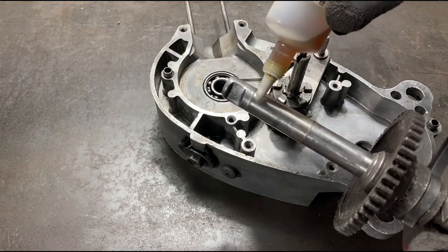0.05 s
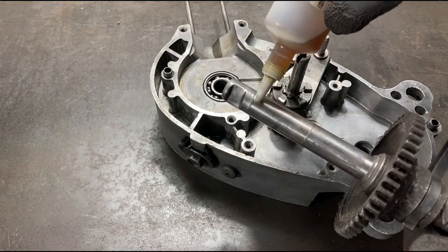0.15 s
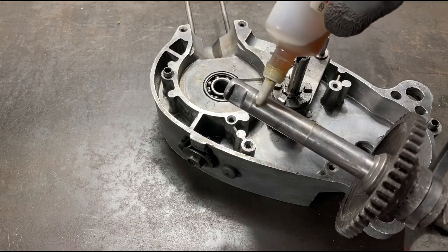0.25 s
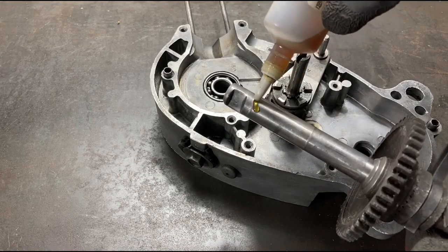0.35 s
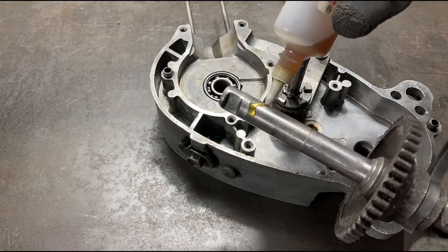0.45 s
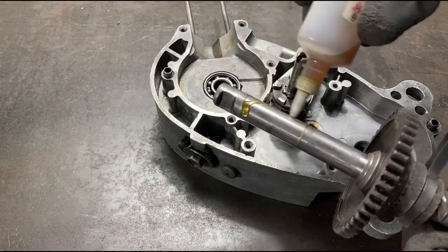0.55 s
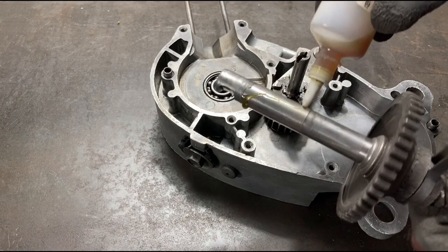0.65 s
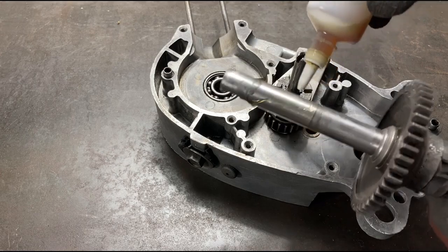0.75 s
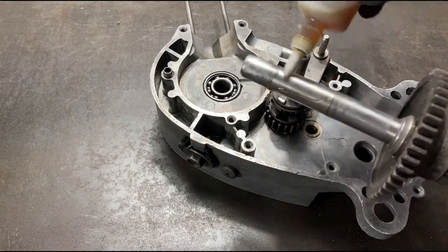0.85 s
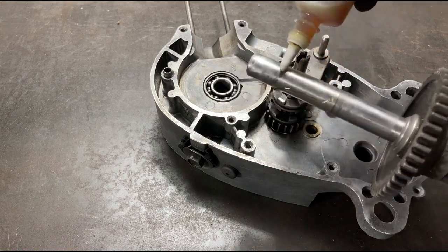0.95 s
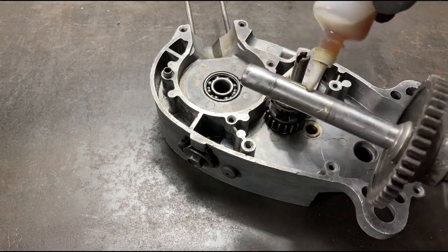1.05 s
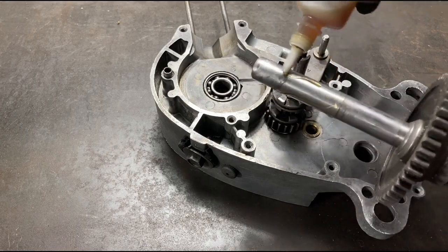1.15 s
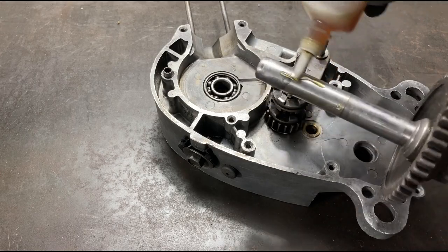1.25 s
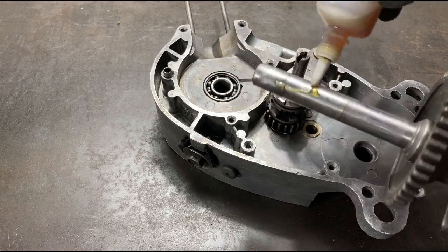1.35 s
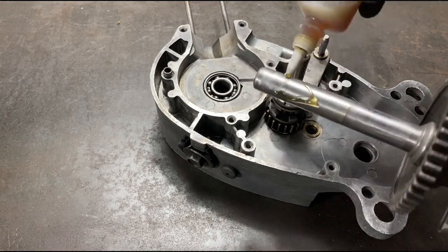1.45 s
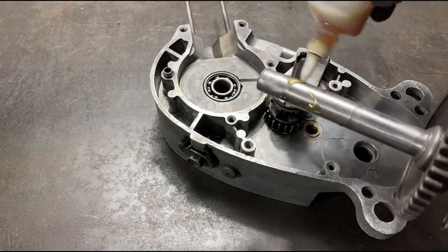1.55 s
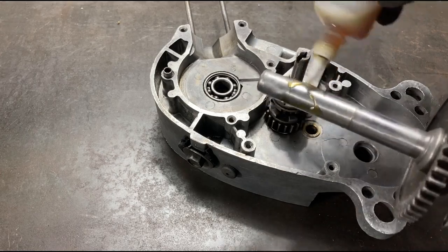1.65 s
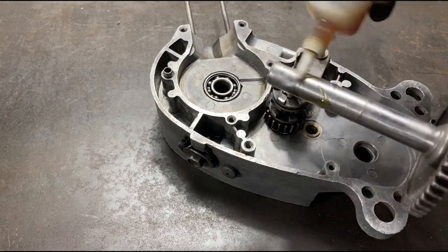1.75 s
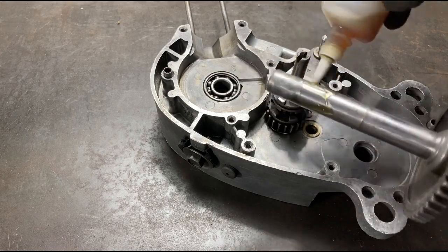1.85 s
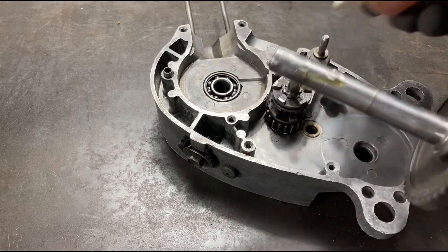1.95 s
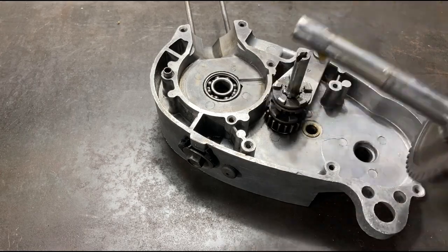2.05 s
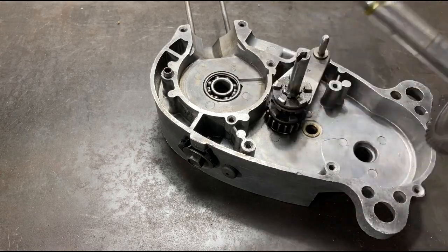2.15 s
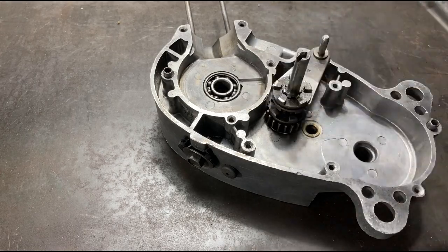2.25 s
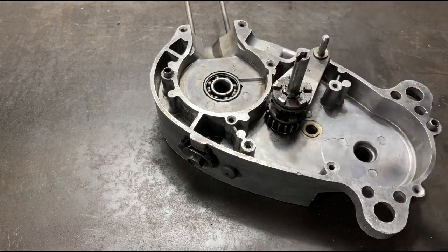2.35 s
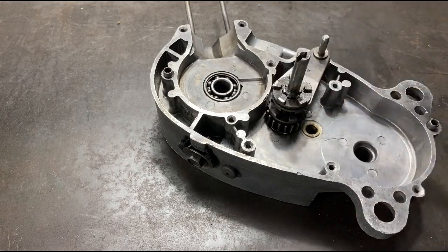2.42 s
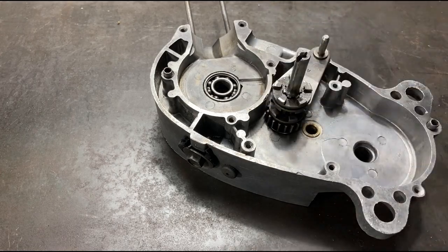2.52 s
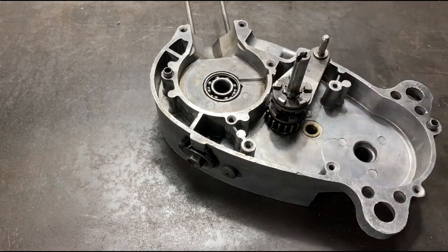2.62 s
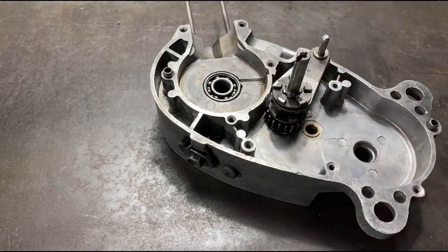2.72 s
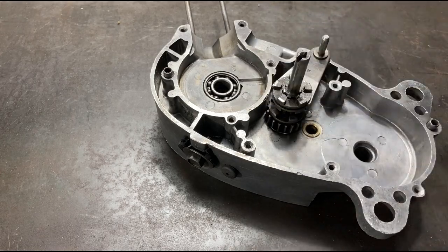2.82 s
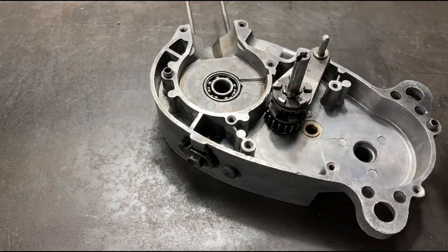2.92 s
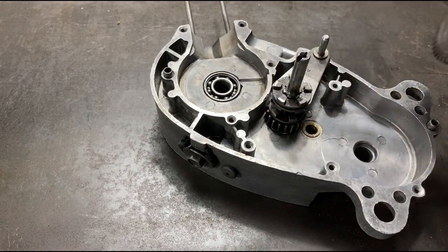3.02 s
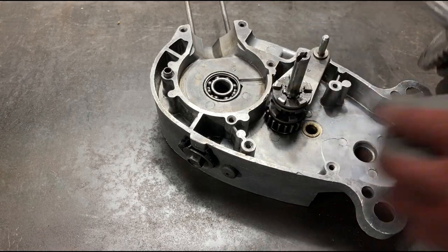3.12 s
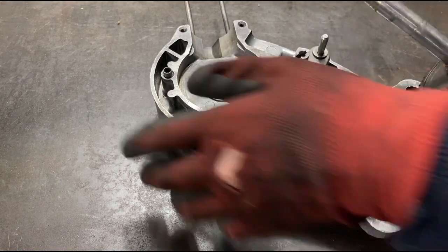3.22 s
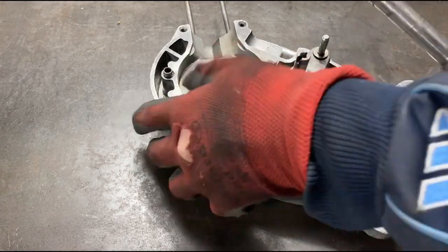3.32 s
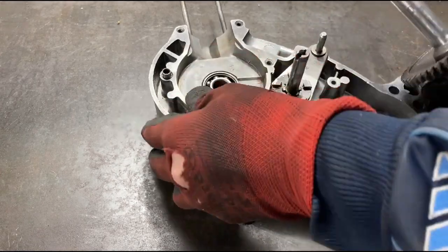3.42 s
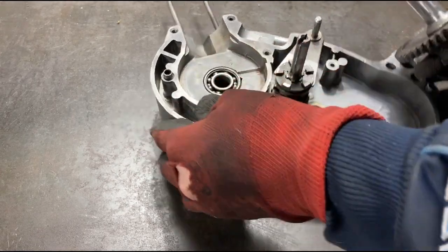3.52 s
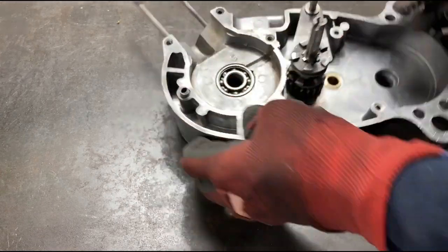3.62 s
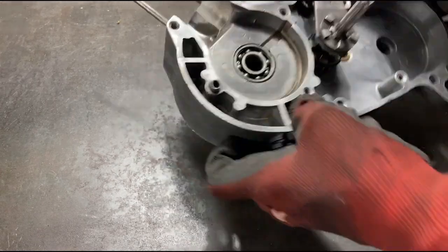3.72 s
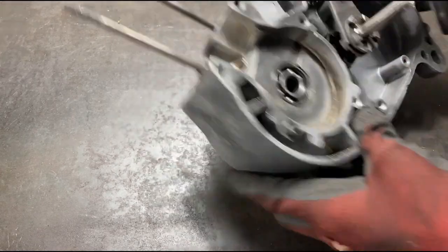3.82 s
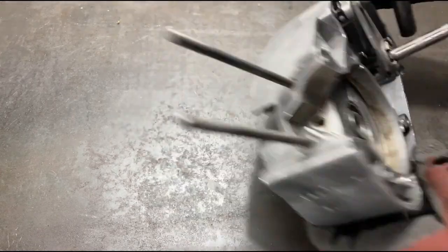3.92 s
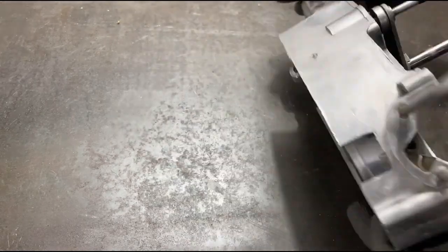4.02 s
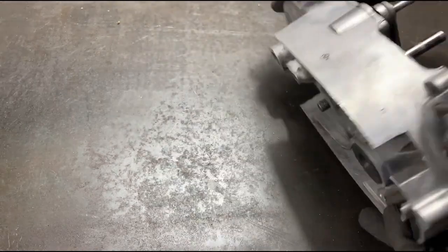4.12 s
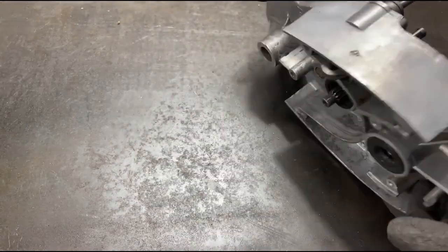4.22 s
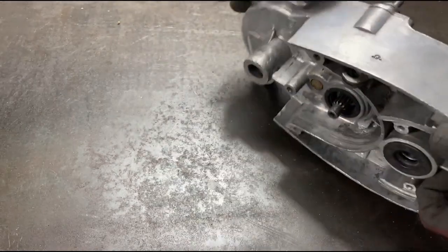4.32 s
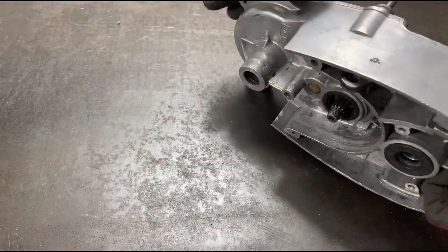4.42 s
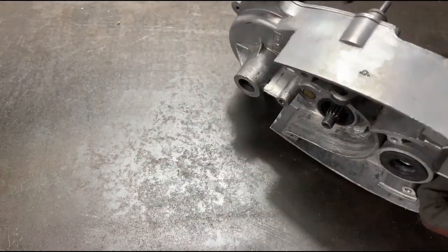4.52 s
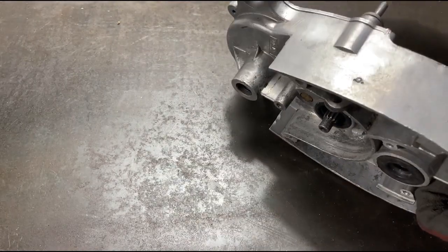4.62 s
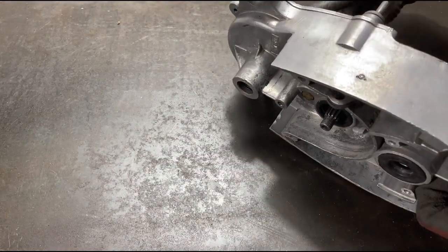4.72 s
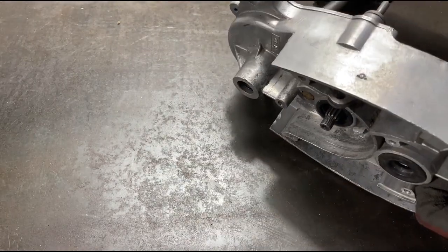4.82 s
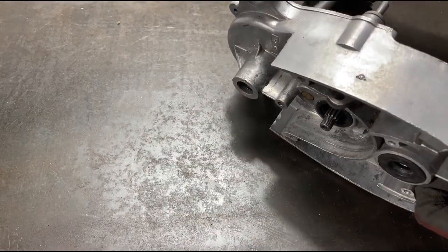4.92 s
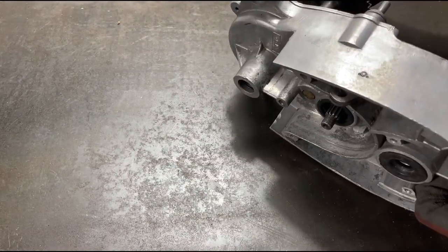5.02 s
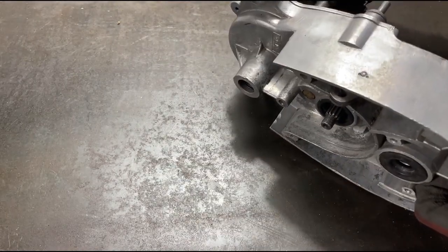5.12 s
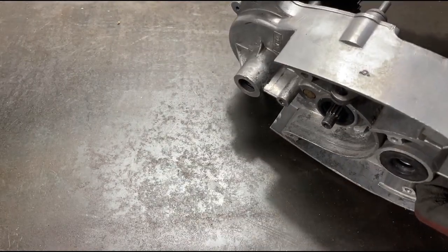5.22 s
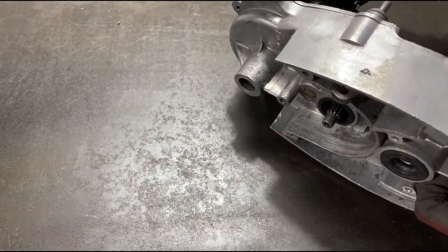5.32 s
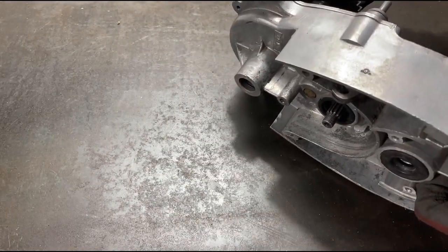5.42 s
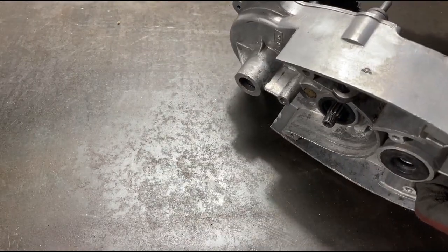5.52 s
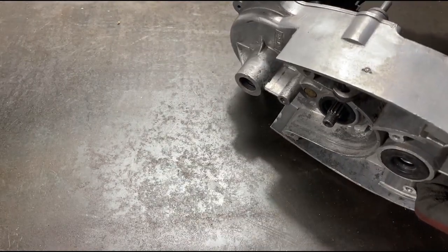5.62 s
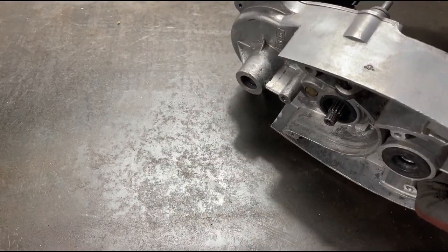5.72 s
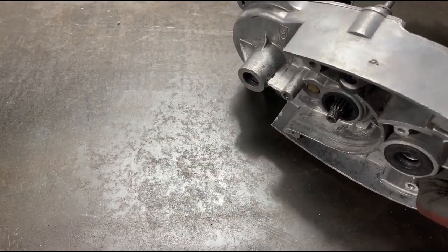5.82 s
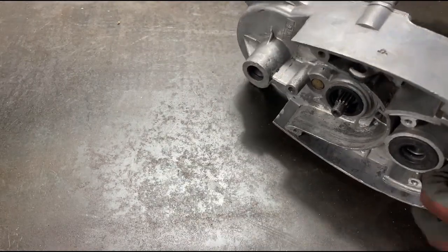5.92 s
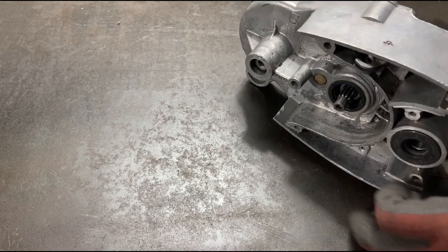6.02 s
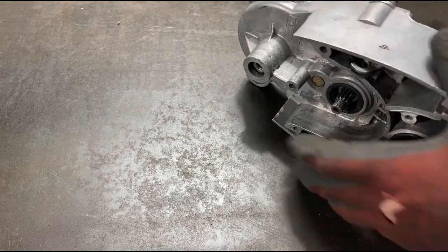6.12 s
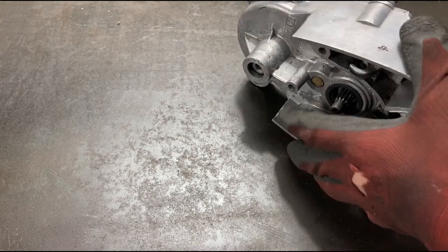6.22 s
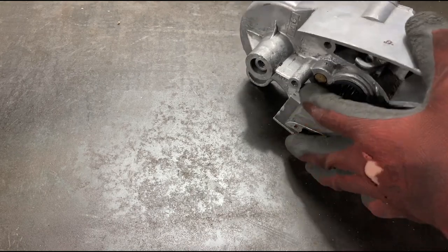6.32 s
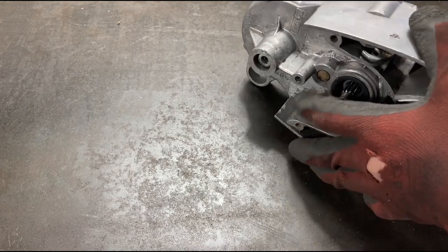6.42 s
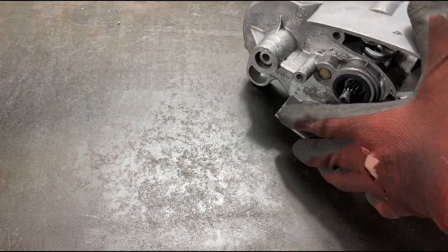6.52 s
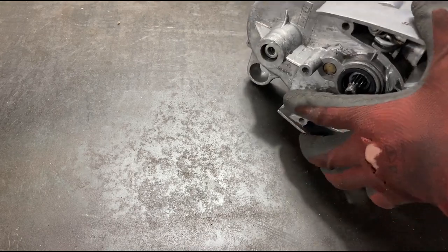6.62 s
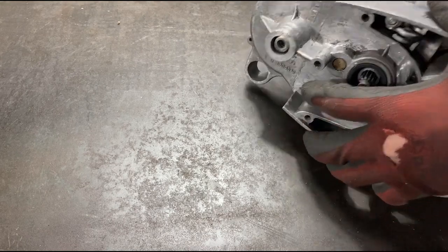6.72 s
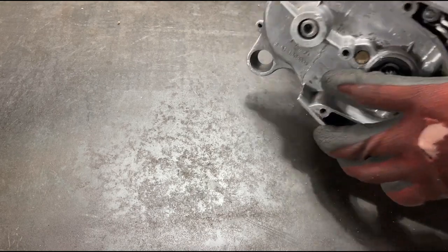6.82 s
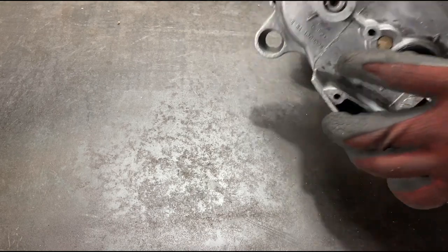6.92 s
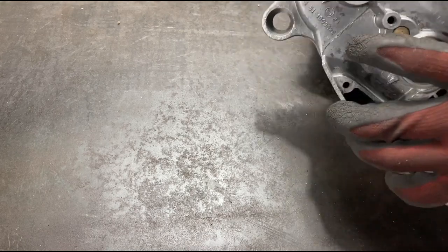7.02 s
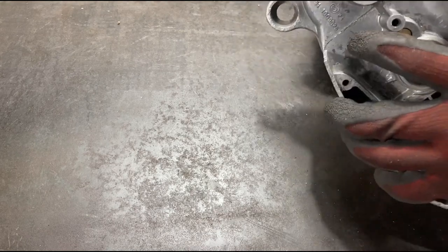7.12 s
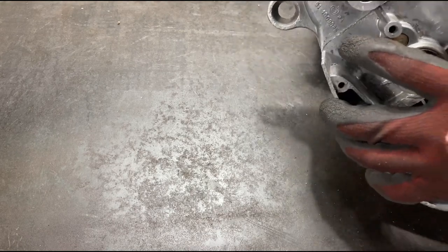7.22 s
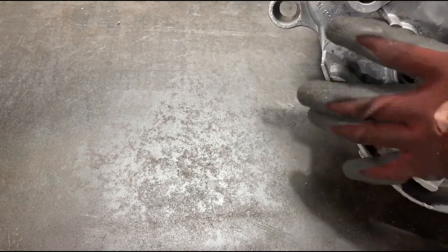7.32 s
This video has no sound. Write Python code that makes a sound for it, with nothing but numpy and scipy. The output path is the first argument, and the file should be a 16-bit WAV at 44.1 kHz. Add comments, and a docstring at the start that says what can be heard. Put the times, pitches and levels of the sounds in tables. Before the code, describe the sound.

A close microphone picks up work on a steel bench in a quiet workshop, with faint low traffic rumble outside. For the first two and a half seconds an oiled gear shaft makes light ticks and soft rubbing against an aluminium engine case. A firmer knock comes at 2.6 seconds and a loud, sharp clank at 3.3. Gloves and sleeves rustle among small clicks as the case is gripped. From about 4.1 to 4.5 seconds it is tipped, giving a cluster of loud clanks, bench thuds and a short scrape. Moderate knocks follow near 5.3 and 5.7 seconds, then small taps, rustles and faint brief squeaks, with a dull bump at 6.8. A loud clank with a thud lands at about 7.3 seconds. Each hit rings only briefly, with a short room tail.

```python
"""A quiet workshop, one microphone close to a steel-topped bench, traffic rumbling outside.
An oiled gear shaft is handled and fitted into an aluminium engine case. Each knock or tick is a
shower of micro-impacts that rings the case and thuds on the bench, with a short tail from the room.
Gloves and sleeves rustle and the case scrapes as it is tipped: countless tiny slips. Brief narrow
tones come and go, some from sliding parts, some from metal ringing on after a knock."""
import sys
import numpy as np
from scipy import signal
from scipy.fft import rfft, irfft
from scipy.io import wavfile

SR = 44100
rng = np.random.default_rng(int(sys.argv[2]) if len(sys.argv) > 2 else 0)


def digitize_waveform(pressure):
    """Quantize a signal to 16-bit integers and store it at the path in sys.argv[1].

    Rows of a 2-D input are taken as channels; values are limited to [-1, 1].
    """
    field = np.atleast_2d(pressure).T
    bounded = np.clip(field, -1, 1)
    quanta = np.round(bounded * 32767).astype(np.int16)
    wavfile.write(sys.argv[1], SR, quanta)


N = 324576

# modes of the case and gears, woken by knocks and by rubbing: pitch_hz, relative_db, t60_s
CASE_MODES = [(636, -16.5, 0.016), (665, -8.5, 0.041), (820, 1, 0.035), (955, 3, 0.05), (1282, -3, 0.021),
              (1520, -4.5, 0.034), (1694, 0, 0.032), (1920, -12, 0.011), (2150, -13.5, 0.042),
              (2350, 8.5, 0.015), (2520, -13.5, 0.12), (2830, -4.5, 0.021), (3080, -6.5, 0.11),
              (3330, 3.5, 0.015), (3400, -8.5, 0.08), (3690, 2, 0.021), (4055, -2.5, 0.012),
              (4675, 2.5, 0.037), (5050, 2.5, 0.03), (5460, 1, 0.044), (5800, -4.5, 0.048),
              (6180, 2, 0.024), (7270, -3.5, .012), (9800, -13.5, 0.033), (10940, -15.5, 0.017)]


def from_db(db):
    """Decibels to gain."""
    return 10 ** (np.asarray(db) / 20)


def rms_one(x):
    """Scale to unit rms."""
    return x / np.sqrt(np.mean(x ** 2) + 1e-20)


def in_time(rows):
    """Columns of a curve table, one value per sample."""
    time_s, *columns = np.transpose(rows)
    return [np.interp(np.arange(N) / SR, time_s, column) for column in columns]


def at_pitch(hz, points_hz, values):
    """Read a curve along a logarithmic frequency axis."""
    return np.interp(np.log(hz), np.log(points_hz), values)


def drift(rate_hz):
    """Slow wander with a spread of 1: noise twice through a one-pole low-pass."""
    hop, settle = 40, 2000
    pole = np.exp(-2 * np.pi * rate_hz * hop / SR)
    noise = rng.standard_normal(N // hop + settle + 2)
    slow = signal.lfilter([1], [1, -2 * pole, pole * pole], noise)[settle:]
    return np.interp(np.arange(N) / hop, np.arange(len(slow)), rms_one(slow))


def band(x, low_hz, high_hz):
    """Band-pass."""
    return signal.sosfilt(signal.butter(2, [low_hz, high_hz], "band", fs=SR, output="sos"), x + 1e-18)


def ring(x, hz, t60_s):
    """One mode: a unit click sets a sine of height 1 ringing down."""
    pole, angle = from_db(-60 / (t60_s * SR)), 2 * np.pi * hz / SR
    return signal.lfilter([0, np.sin(angle)], [1, -2 * pole * np.cos(angle), pole * pole], x + 1e-18)


def coloured(spectrum):
    """Steady noise of rms 1, shaped by rows of frequency_hz, relative_db."""
    bins_hz = np.maximum(np.fft.rfftfreq(N, 1 / SR), 1)
    gains = from_db(at_pitch(bins_hz, *np.transpose(spectrum)))
    return rms_one(irfft(rfft(rng.standard_normal(N)) * gains, N))


def laid_out(starts, bursts, gains):
    """Every burst placed at its starting sample with its gain."""
    out = np.zeros(N + bursts.shape[1])
    for start, burst, gain in zip(starts, bursts, gains):
        out[start:start + len(burst)] += gain * burst
    return out[:N]


def room_tone(level_db=-64.5):
    """The faint, steady hush of the workshop."""
    # spectrum of the hush: frequency_hz, relative_db
    hush = [(76, -35), (130, 0), (172, -6), (322, -8.5), (651, -16.5), (1370, -19), (3330, -31.5),
            (13600, -34.5), (16000, -47)]
    return from_db(level_db) * coloured(hush)


def engine_note(course):
    """An engine outside, heard as one low sine that wavers in pitch and level."""
    pitch_hz, level_db = in_time(course)
    height = np.sqrt(2) * from_db(level_db + 0.9 * drift(14))
    return height * np.sin(2 * np.pi * np.cumsum(pitch_hz + 2.8 * drift(5.26)) / SR)


def traffic():
    """The street heard from indoors: two engine notes in a lumpy low rumble."""
    # spectrum of the rumble: frequency_hz, relative_db
    rumble_spectrum = [(8.8, -64.5), (15, -27.5), (60, 4.5), (81, 2), (111, 3), (127, -9), (140, -33),
                       (170, -17), (220, -62), (370, -120)]
    # rise and fall of the rumble: time_s, level_db
    rumble_level = [(0, -53), (1.2, -57), (3.0, -54), (4.2, -59.5), (5.9, -55.5), (7.36, -71.5)]
    # one engine that wanders, one that nearly holds its note: time_s, pitch_hz, level_db
    wandering = [(0, 88, -69), (1.2, 84, -57), (1.5, 94.27, -49), (2.0, 99, -53), (2.4, 81.5, -55),
                 (3.05, 88.74, -49.5), (3.3, 77, -50), (3.9, 76.14, -54.5), (4.4, 71.6, -58.5),
                 (4.85, 77.2, -53.5), (5.7, 78.9, -53), (5.95, 60.1, -59.5), (6.4, 58, -60.5),
                 (7.36, 71.4, -63)]
    holding = [(0, 98.7, -54.5), (1.6, 103.7, -69.5), (2.6, 105.4, -59.5), (5.6, 105.3, -59),
               (6.1, 116.4, -58.5), (7.36, 110.2, -71)]
    rumble = from_db(in_time(rumble_level)[0]) * coloured(rumble_spectrum)
    return engine_note(wandering) + engine_note(holding) + rumble


def wall_echoes(x, t60_s=0.35, wall_cut_hz=4600):
    """Sound bouncing round the workshop: ten feedback delays, duller on every round."""
    out, dull = np.zeros(N), np.exp(-2 * np.pi * wall_cut_hz / SR)
    for k, lag in enumerate((np.geomspace(.007, .037, 10) * SR).astype(int)):
        loop, gain, state = x.copy(), from_db(-60 * lag / SR / t60_s), [0.]
        for i in range(lag, N, lag):
            echo, state = signal.lfilter([gain * (1 - dull)], [1, -dull], loop[i - lag:i], zi=state)
            loop[i:i + lag] += echo[:N - i]
        out += (loop - x) * (-1) ** k
    return out


def micro_slips(per_s, spread_db):
    """Friction as random clicks of uneven size, in clumps."""
    sizes = from_db(spread_db * np.minimum(rng.exponential(1, N), 5)) * rng.choice([-1, 1], N)
    return sizes * (rng.random(N) < per_s * from_db(3.0 * drift(40)) / SR)


def swells(length_ms):
    """Envelopes that swell fast and fade slowly, cut off after about 180 ms."""
    t = np.arange(8000) / SR
    progress = np.clip((t + 0.0029) / (length_ms[:, None] / 1000 + 0.0047), 0, 1)
    return np.sin(np.pi * progress ** 0.56) ** 1.8


def squeaks_and_rings(t60_s=0.02):
    """Brief narrow tones, some from sliding parts, some from metal ringing on after a knock."""
    # squeaks and rings: start_s, length_ms, pitch_hz, level_db
    brief_tones = [(0.47, 130, 975, -58.5), (0.62, 79, 1065, -56.5), (1.3, 70, 1270, -69),
                   (1.63, 69, 1550, -66), (2.25, 61, 1880, -67), (2.38, 39, 2080, -69),
                   (2.56, 55, 748, -41), (2.66, 28, 2480, -50.5), (3.28, 146, 710, -50),
                   (3.55, 160, 4700, -74), (3.58, 84, 6110, -53), (4.03, 99, 2050, -49.5),
                   (4.56, 36, 2250, -52), (5.55, 54, 710, -52), (5.72, 32, 720, -44),
                   (5.82, 130, 4700, -84), (5.92, 40, 893, -53.5), (6.47, 70, 3450, -54.5),
                   (6.47, 57, 950, -54), (6.64, 130, 1222, -63)]
    start_s, length_ms, pitch_hz, level_db = np.transpose(brief_tones)
    swell = swells(length_ms)
    clicks = micro_slips(1500, spread_db=3.0)[:swell.shape[1]]
    tones = np.array([rms_one(ring(np.roll(clicks, 400 * k), hz, t60_s))
                      for k, hz in enumerate(pitch_hz)])
    return laid_out((start_s * SR).astype(int), tones * swell, from_db(level_db))


def rubbing(case_taken_s=3.4):
    """Slips heard directly and through the modes of the case, swelling unevenly with each stroke."""
    # strokes of gloves, sleeves and metal: start_s, length_ms, drag_db, rustle_db
    strokes = [(0.039, 82, -64.5, -95), (0.348, 172, -57.5, -102), (0.449, 310, -59.5, -107),
               (0.573, 300, -59, -80), (0.81, 66, -60, -101), (0.908, 110, -79, -68), (1.031, 25, -63, -73),
               (1.079, 61, -65, -71), (1.14, 110, -61, -97), (1.189, 110, -68, -67),
               (1.297, 186, -78, -66.5), (1.61, 79, -79, -77), (1.78, 8.3, -79, -70),
               (1.828, 200, -73, -69.5), (2.046, 89, -82, -64), (2.132, 59, -79, -62),
               (2.199, 150, -73, -68.5), (2.576, 100, -55, -70), (2.66, 69, -53, -73),
               (2.892, 100, -62, -62.5), (2.97, 135, -64, -66), (3.099, 85, -66, -61.5),
               (3.235, 71, -77, -61), (3.428, 69, -57.5, -92), (3.497, 57, -53, -55), (3.529, 72, -46, -64),
               (3.588, 128, -44.5, -56.5), (3.636, 74, -53, -51), (3.7, 51, -53, -85),
               (3.791, 7.6, -55, -59), (3.832, 34, -75, -55.5), (3.862, 20.4, -66, -42.5),
               (4.02, 74, -62.5, -63.5), (4.109, 174, -40.5, -51), (4.262, 34, -63.5, -51),
               (4.297, 58, -24, -54), (4.429, 47, -46.5, -58.5), (4.552, 38, -80, -61),
               (5.339, 90, -57, -66), (5.561, 82, -62.5, -81), (5.661, 205, -57.5, -73),
               (5.811, 67, -58.5, -67), (5.902, 186, -59.5, -66), (6.031, 53, -68, -56),
               (6.055, 83, -54.5, -53.5), (6.168, 137, -77, -62), (6.318, 97, -64.5, -68.5),
               (6.469, 140, -82, -71.5), (6.701, 59, -60.5, -70.5), (6.796, 74, -54.5, -68.5)]
    # faint handling between strokes: time_s, relative_db
    handling = [(0.0, -59.5), (2.95, -63.5), (4.37, -48.5), (4.59, -64), (7.36, -63.5)]
    start_s, length_ms, drag_db, rustle_db = np.transpose(strokes)
    scrape_db = np.maximum(drag_db - 16, rustle_db + 2.5)   # both also scrape in the middle register
    starts, swell = (start_s * SR).astype(int), swells(length_ms)

    def envelope(level_db):
        """All the strokes in turn, each at its level."""
        return laid_out(starts, swell, from_db(level_db))

    fidget = from_db(in_time(handling)[0] + 0.83 * drift(4.5))
    slips = rms_one(micro_slips(5000, spread_db=3.4))
    slips *= from_db(2.0 * drift(60))   # the grip catches and lets go
    drag = envelope(drag_db) * rms_one(band(slips, 150, 1900))
    scrape = (envelope(scrape_db) + 0.39 * fidget) * rms_one(band(slips, 1000, 4500))
    rustle = (envelope(rustle_db) + 0.18 * fidget) * rms_one(band(slips, 3000, 11000))
    out = drag + scrape + rustle
    wake_db = np.where(start_s < case_taken_s, -43, -33)   # the case hardly rings until it is taken up
    spot_db = 4.0 * rng.standard_normal((len(starts), len(CASE_MODES)))   # each stroke rubs a new spot
    for k, (hz, mode_db, t60_s) in enumerate(CASE_MODES):
        stroke_db = drag_db if hz < 1200 else scrape_db if hz < 4500 else rustle_db
        out += ring(slips * envelope(stroke_db + mode_db + wake_db + spot_db[:, k]), hz, t60_s)
    return out


def knocks(contact_decay_s=0.00262, contact_rise_s=0.00247, first_impact=3.0, clatter_db=-18.5):
    """A contact is a shower of micro-impacts: it cracks, clatters, rings the case, thuds on the bench."""
    # parts meeting case and bench: start_s, knock_db, clank_db, snap_db, favoured_hz
    contacts = [(0.614, -41.5, -69, -54, 890), (0.9068, -65, -43, -49.5, 1670),
                (1.5835, -70, -53, -63, 1570), (1.9066, -85, -54, -46.5, 1750),
                (1.9686, -85, -50.5, -64, 3250), (2.1753, -70, -45.5, -45.5, 1830),
                (2.3766, -82, -43.5, -43.5, 2120), (2.4229, -66, -49, -50, 1000),
                (2.5539, -23.5, -32, -44, 575), (2.616, -57, -42, -39.5, 2240),
                (2.6553, -34.5, -37, -63, 298), (2.9419, -79, -39.5, -43.5, 4170),
                (2.982, -55, -40, -55, 2600), (3.14, -49, -39, -38, 2300),
                (3.2593, -14.5, -14.5, -35, 1420), (3.5492, -51, -37, -35, 2200),
                (3.656, -51, -32, -34, 4000), (3.6785, -53, -30.5, -40.5, 1480),
                (3.7299, -43, -35.5, -74, 1960), (3.7918, -54, -63, -49, 2000),
                (3.871, -44, -37, -35.5, 1930), (3.9755, -65, -52, -44, 9200), (3.985, -64, -46, -47, 3000),
                (4.022, -62.5, -48, -53, 2000), (4.0747, -17.5, -6.5, -18.5, 3515),
                (4.2009, -33.5, -21, -38, 1300), (4.2396, -55, -40, -38, 1980),
                (4.29, -21.5, -44, -45, 996), (4.2966, -17.5, -17, -26, 230), (4.3136, -21, -14, -28, 1490),
                (4.398, -66, -50, -40, 8000), (4.407, -14.5, -15.5, -27, 1570),
                (4.416, -24.5, -22, -32.5, 294), (4.4752, -42, -44, -41, 1260),
                (4.5702, -54.5, -35, -48, 2200), (5.272, -29, -33, -55, 1460),
                (5.3532, -45, -59, -64.5, 845), (5.552, -40, -43.5, -52.5, 6200),
                (5.6865, -47, -57, -56, 838), (5.7211, -34.5, -33, -51, 793), (5.8117, -65, -53, -61, 4600),
                (5.966, -62, -46, -43.5, 11000), (6.0545, -59, -37, -39.5, 4850),
                (6.1336, -40.5, -43, -62, 860), (6.182, -72, -48.5, -69, 2410),
                (6.34, -76, -45, -48.5, 2070), (6.444, -50.5, -41.5, -56, 939),
                (6.4812, -59, -45, -58, 3300), (6.5417, -47.5, -46, -60, 920),
                (6.5722, -53.5, -44, -61, 950), (6.605, -54, -45.5, -52.5, 985),
                (6.7144, -41.5, -66, -61, 302), (6.749, -46.5, -45, -80, 980), (6.8037, -51, -40, -56, 958),
                (6.8281, -28, -36.5, -69, 240), (6.974, -78, -80, -48, 1012), (7.011, -64, -55, -72, 2350),
                (7.2611, -28, -25.5, -27, 2820), (7.267, -14, -10, -18.5, 4060),
                (7.2709, -18.5, -12, -28, 202), (7.2748, -13.5, -13, -25, 1260)]
    # tone of the crack: frequency_hz, relative_db
    crack_spectrum = [(170, -6.5), (350, -11.5), (800, -7.5), (2500, -16), (8000, -8.5), (15000, -18.5)]
    # countless weak modes dying away as noise: frequency_hz, t60_s
    clatter_decay = [(200, 0.76), (700, 0.096), (2500, 0.27), (8000, 0.21)]
    # modes of the steel bench top: pitch_hz, relative_db, t60_s
    bench_modes = [(60, 1.5, 0.16), (125, -33, 0.24), (206, -9.5, 0.16), (270, -5.5, 0.17), (320, -6, 0.18),
                   (403, -4.5, 0.067), (507, -17.5, 0.018)]
    start_s, knock_db, clank_db, snap_db, favoured_hz = np.transpose(contacts)
    thud_db = knock_db - 14
    colours_db = np.transpose([thud_db, knock_db, knock_db, clank_db, clank_db, snap_db])
    colour_hz = [300, 550, 1100, 1900, 3300, 5500]
    starts, t = (start_s * SR).astype(int), np.arange(6000) / SR
    widths = np.cumsum([len(t), len(t), len(bench_modes), len(CASE_MODES)])
    chance = rng.standard_normal((len(starts), widths[-1]))
    impact_noise, clatter_noise, bench_spot, case_spot = np.hsplit(chance, widths[:-1])
    contact_fade = np.exp(-t / contact_decay_s)
    showers = impact_noise * contact_fade * (1 - np.exp(-t / contact_rise_s))
    showers[:, 0] = first_impact   # the first touch stands above the shower that follows

    def strength_db(hz, boost_db, octaves):
        """Strength of every contact at one pitch; the struck spot favours pitches near its own."""
        broad_db = [at_pitch(hz, colour_hz, colour) for colour in colours_db]
        return broad_db + boost_db * np.exp(-(np.log2(hz / favoured_hz) / octaves) ** 2)

    def struck(height_db, hz, t60_s):
        """One mode, driven so that each contact leaves it ringing at roughly the given height."""
        heads = showers[:, :2000]
        push_at_pitch = np.abs(heads @ np.exp(2j * np.pi * hz * t[:2000]))
        drive = push_at_pitch + .3 * np.linalg.norm(heads, axis=1)
        return ring(laid_out(starts, heads, from_db(height_db) / drive), hz, t60_s)

    out = np.zeros(N)
    for low_hz in 140 * 2 ** np.arange(0, 7, .5):   # crack and clatter, half an octave at a time
        high_hz = min(low_hz * np.sqrt(2), 15800)
        hz = np.sqrt(low_hz * high_hz)
        t60_s = at_pitch(hz, *np.transpose(clatter_decay))
        clatter_fade = from_db(clatter_db - 60 * t / t60_s) * (1 - np.exp(-t / 0.001))
        cracks = showers + clatter_noise * clatter_fade
        cracks = band(band(cracks, low_hz, high_hz), low_hz, high_hz)
        full_energy = np.sum(contact_fade ** 2 + clatter_fade ** 2)
        cracks *= np.sqrt(full_energy / np.sum(cracks ** 2, axis=1))[:, None]
        crack_db = strength_db(hz, boost_db=6, octaves=.4) + at_pitch(hz, *np.transpose(crack_spectrum))
        out += laid_out(starts, cracks, from_db(crack_db))
    for (hz, mode_db, t60_s), spot in zip(CASE_MODES, case_spot.T[::-1]):
        height_db = strength_db(hz, boost_db=12, octaves=.1) + mode_db - 13.94 + 2.5 * spot
        out += struck(height_db, hz, min(t60_s, .06))
    for (hz, mode_db, t60_s), spot in zip(bench_modes, bench_spot.T):
        height_db = strength_db(hz, boost_db=12.7, octaves=.44) + mode_db + 2 * spot
        out += struck(height_db, hz, t60_s)
    return band(out, 70, 18000)   # small parts radiate no deep bass


def scene():
    """Bench work up close, in mono, with the room and the traffic behind it."""
    direct = knocks()
    room = from_db(-25) * wall_echoes(direct) + room_tone()
    return (direct + rubbing() + squeaks_and_rings() + traffic() + room)[None, :]


def record(dry):
    """The microphone's signal passes a steep low-pass that cuts the very top of the treble."""
    stop_hz, stop_db = 16789, 70
    return signal.sosfilt(signal.cheby2(12, stop_db, stop_hz, fs=SR, output="sos"), dry)


dry = scene()
out = record(dry)
digitize_waveform(out)
```